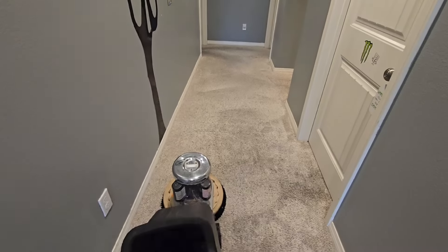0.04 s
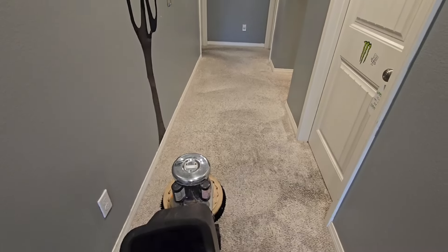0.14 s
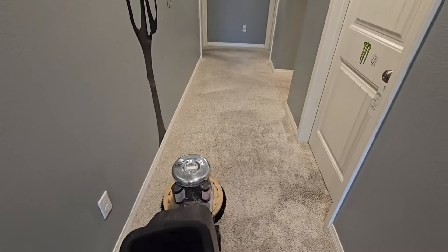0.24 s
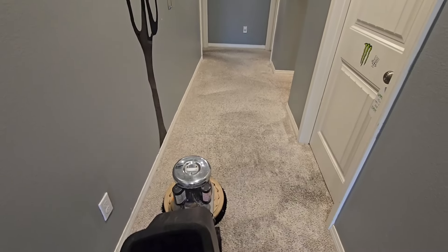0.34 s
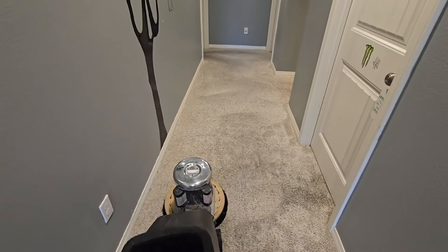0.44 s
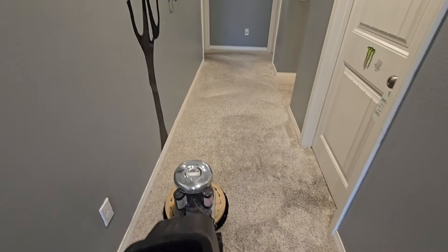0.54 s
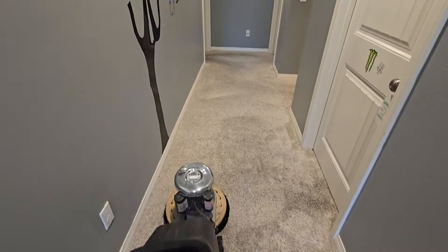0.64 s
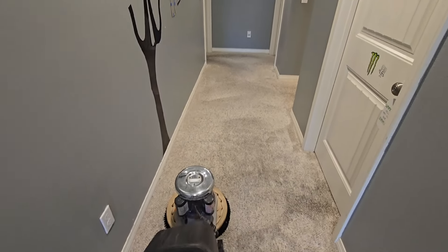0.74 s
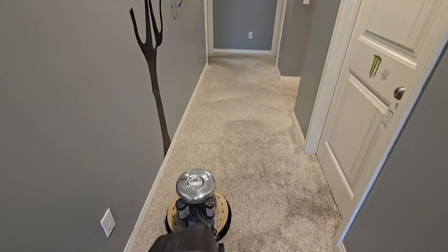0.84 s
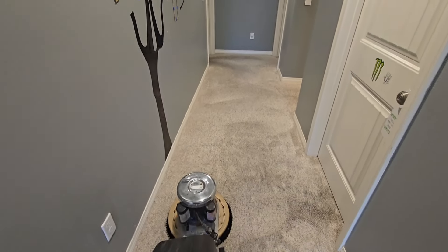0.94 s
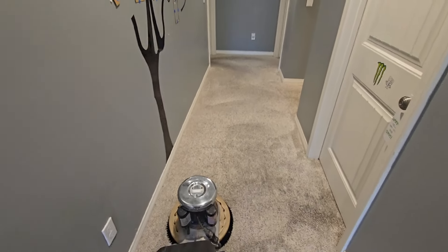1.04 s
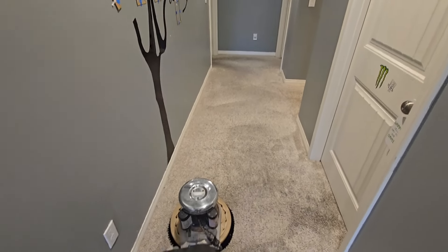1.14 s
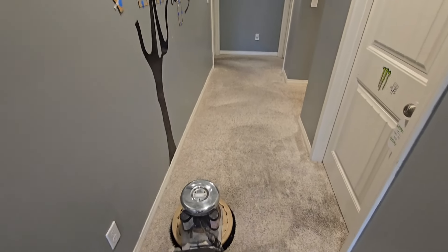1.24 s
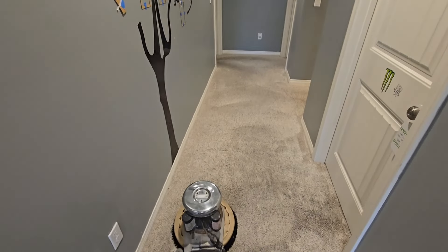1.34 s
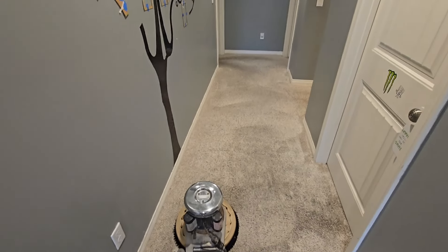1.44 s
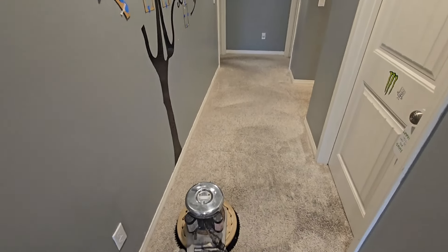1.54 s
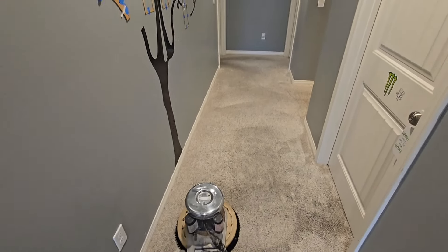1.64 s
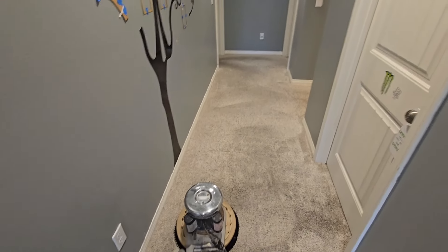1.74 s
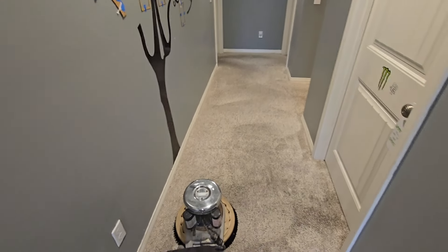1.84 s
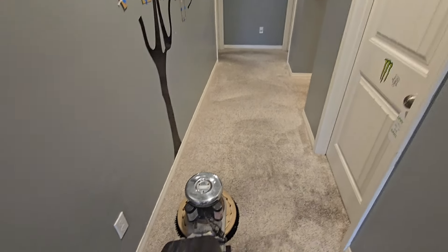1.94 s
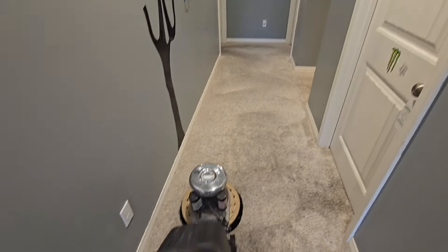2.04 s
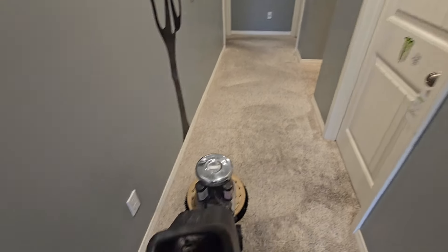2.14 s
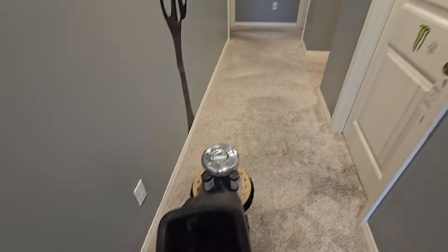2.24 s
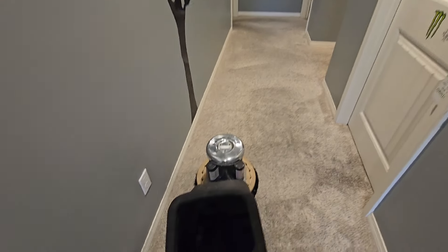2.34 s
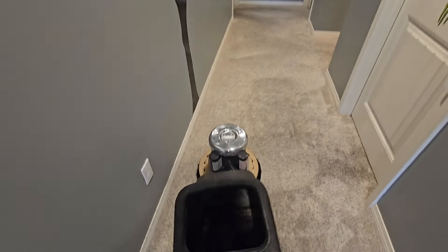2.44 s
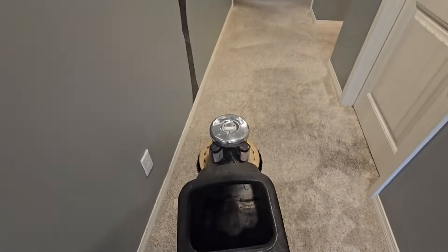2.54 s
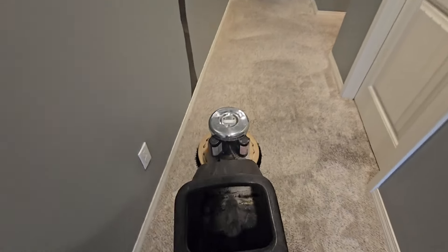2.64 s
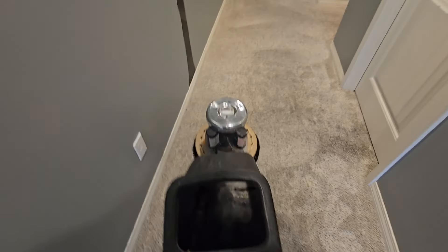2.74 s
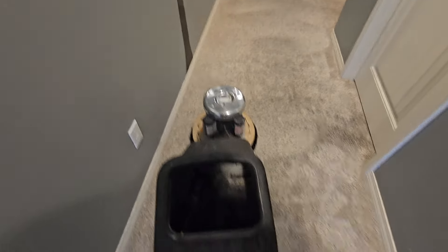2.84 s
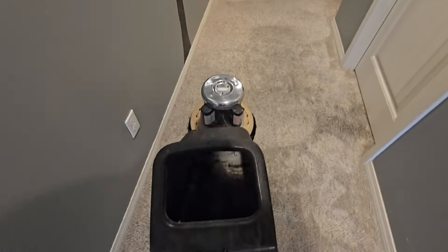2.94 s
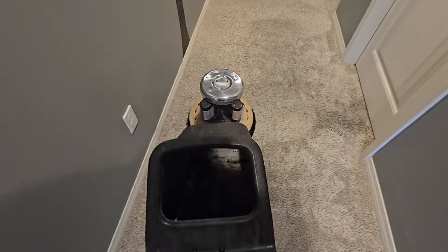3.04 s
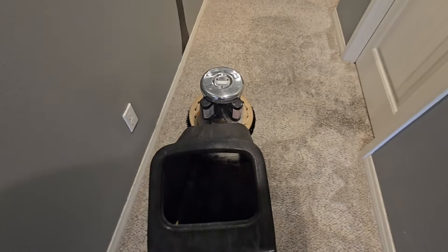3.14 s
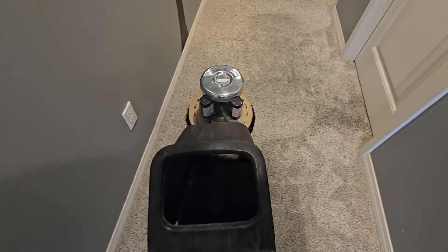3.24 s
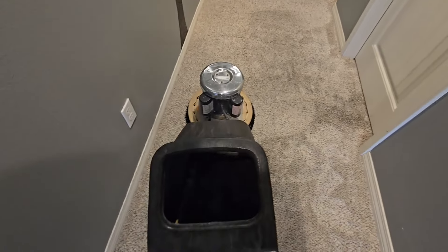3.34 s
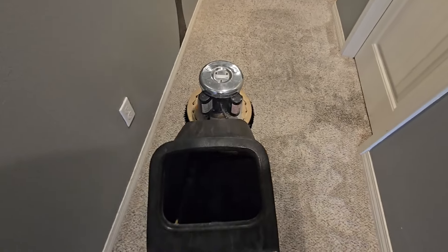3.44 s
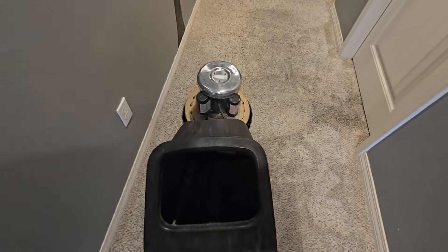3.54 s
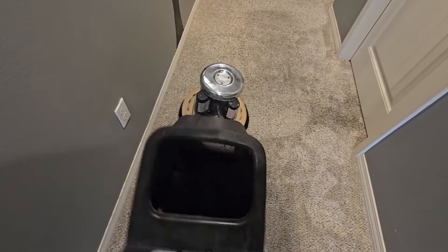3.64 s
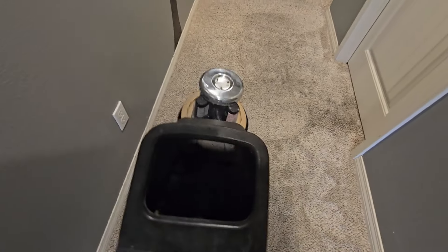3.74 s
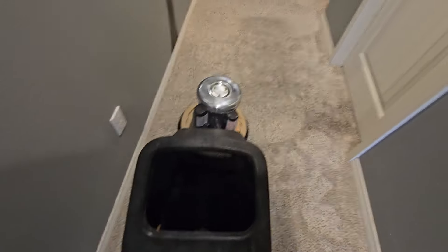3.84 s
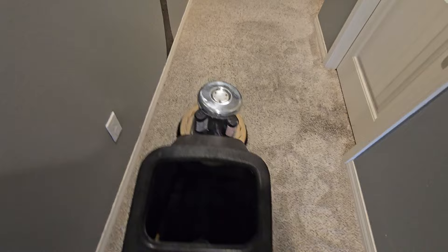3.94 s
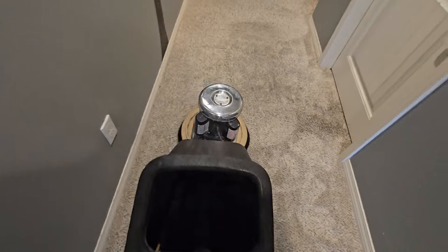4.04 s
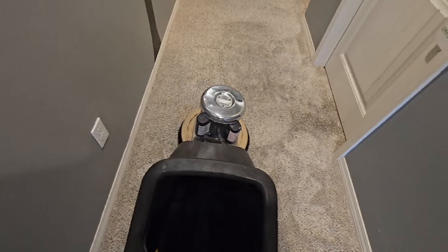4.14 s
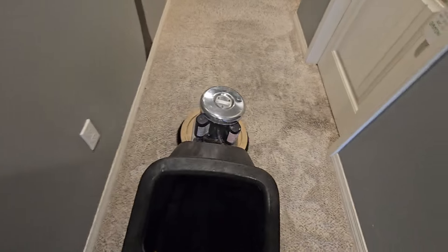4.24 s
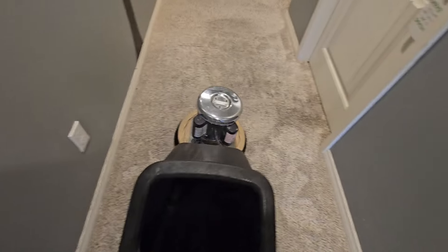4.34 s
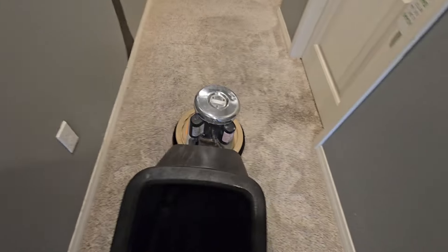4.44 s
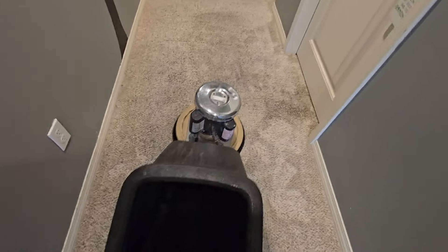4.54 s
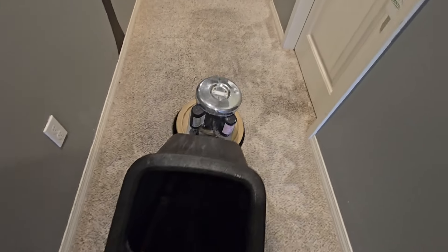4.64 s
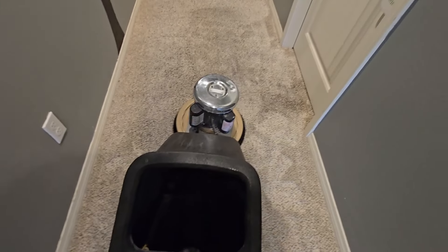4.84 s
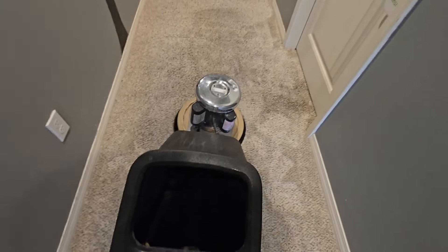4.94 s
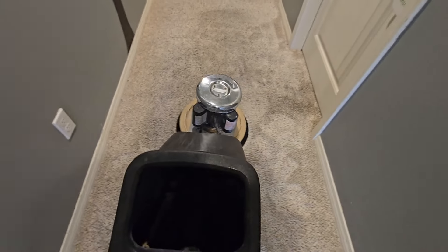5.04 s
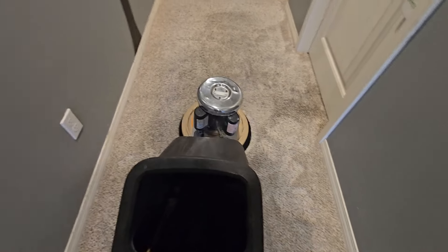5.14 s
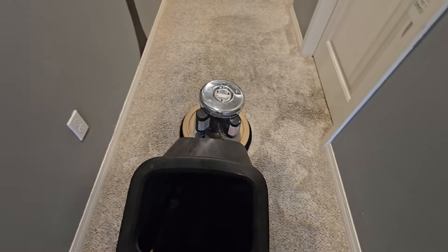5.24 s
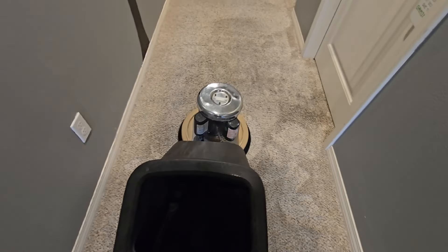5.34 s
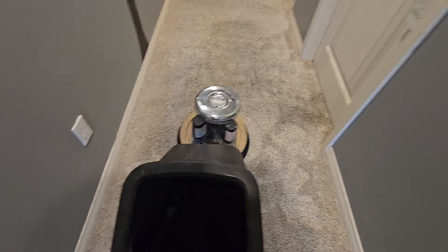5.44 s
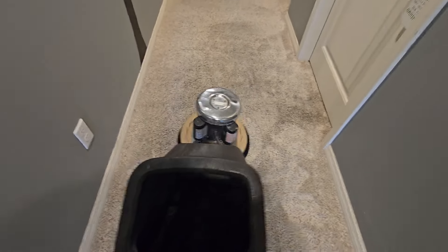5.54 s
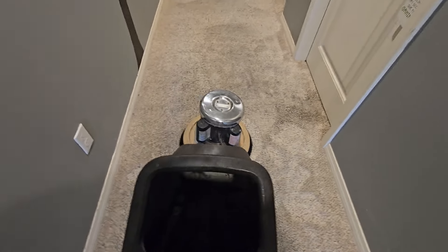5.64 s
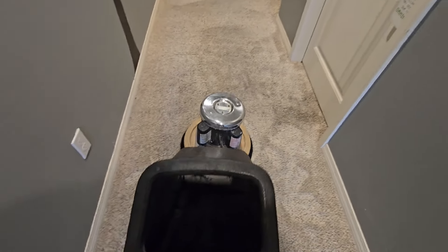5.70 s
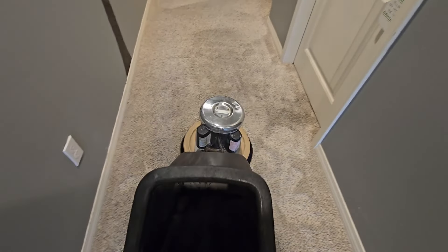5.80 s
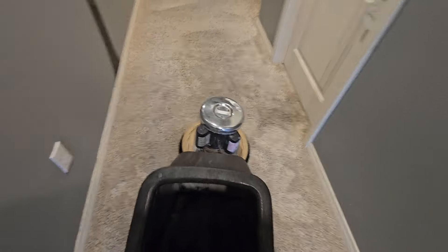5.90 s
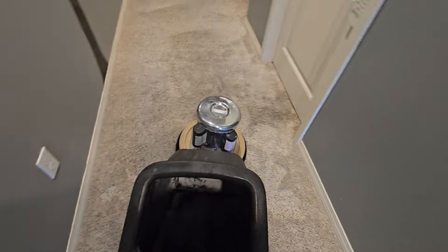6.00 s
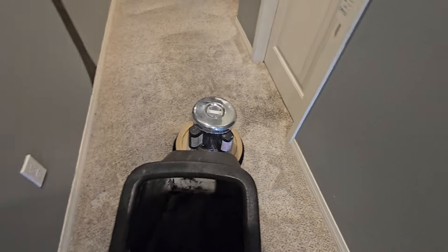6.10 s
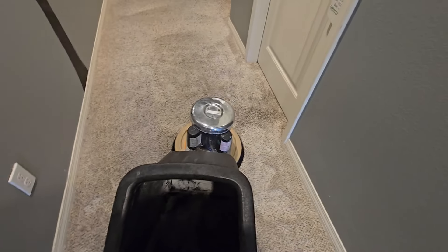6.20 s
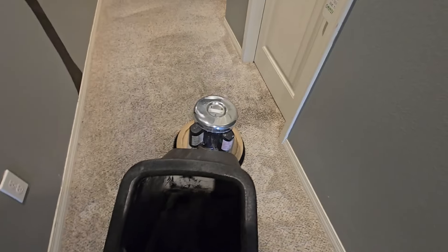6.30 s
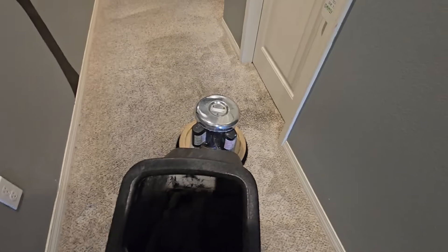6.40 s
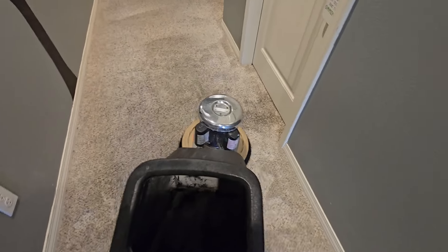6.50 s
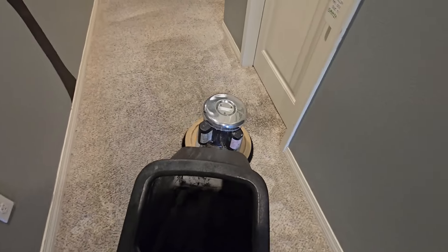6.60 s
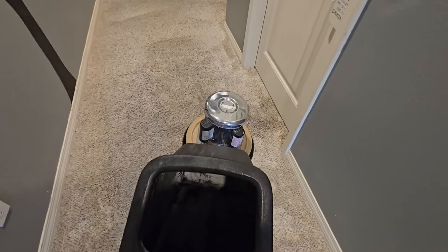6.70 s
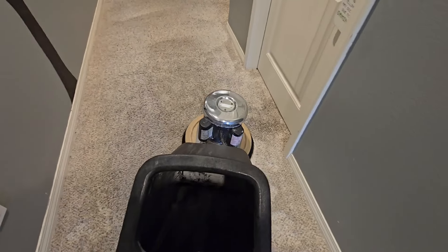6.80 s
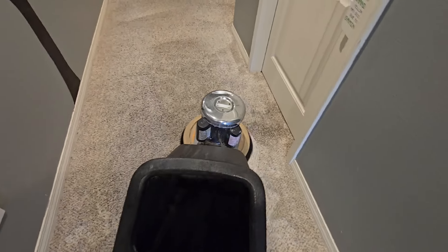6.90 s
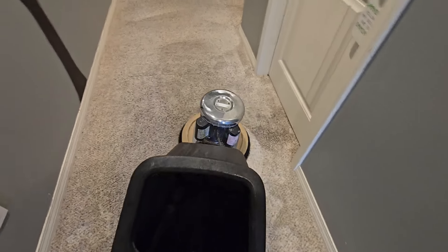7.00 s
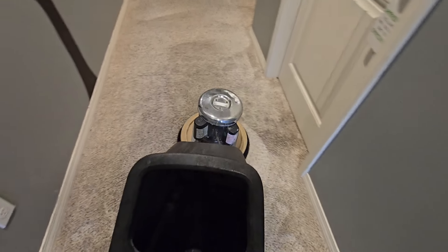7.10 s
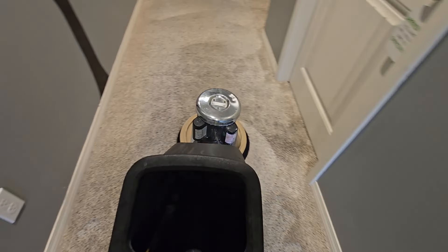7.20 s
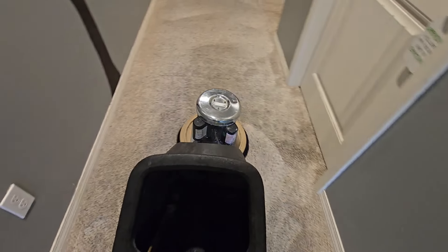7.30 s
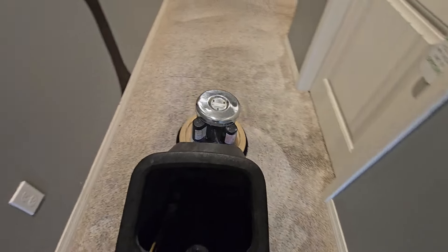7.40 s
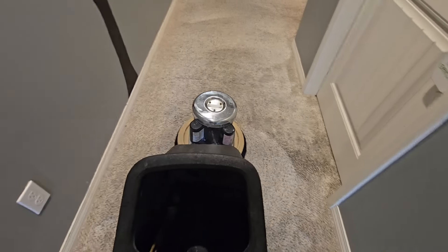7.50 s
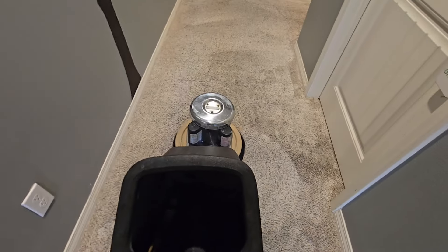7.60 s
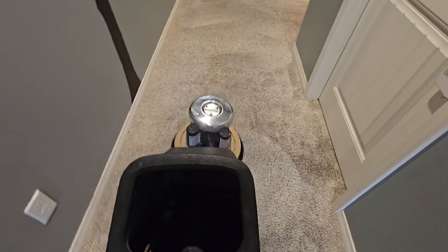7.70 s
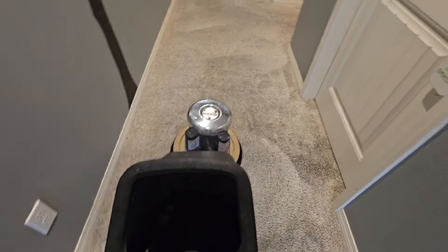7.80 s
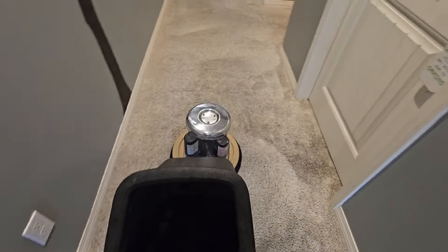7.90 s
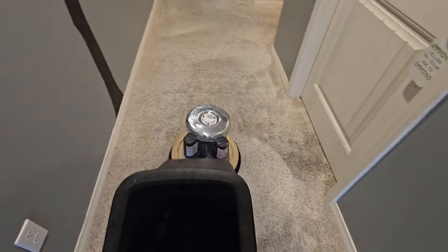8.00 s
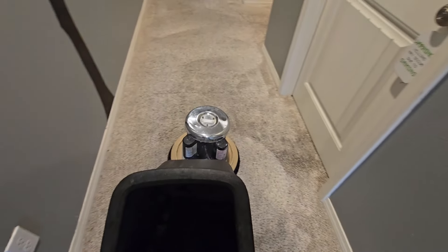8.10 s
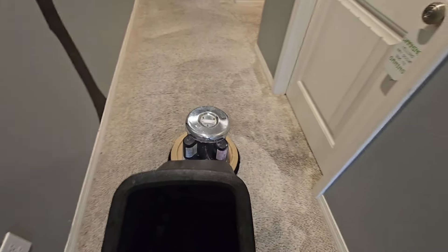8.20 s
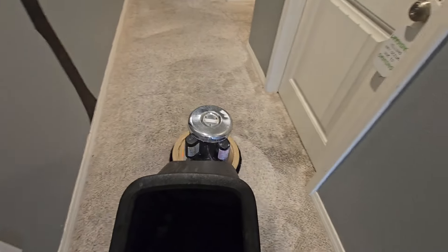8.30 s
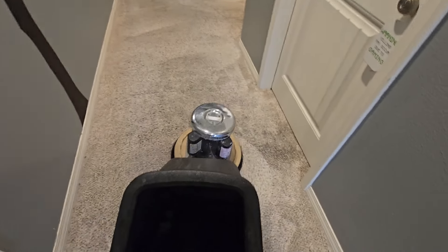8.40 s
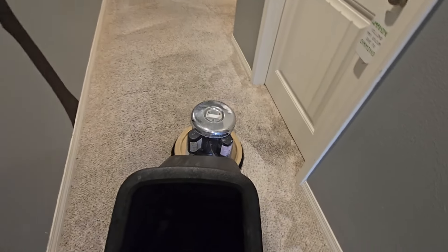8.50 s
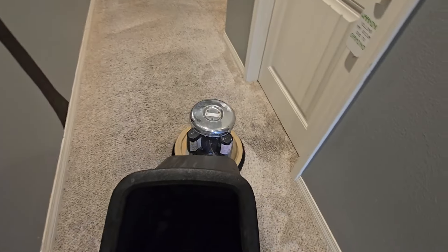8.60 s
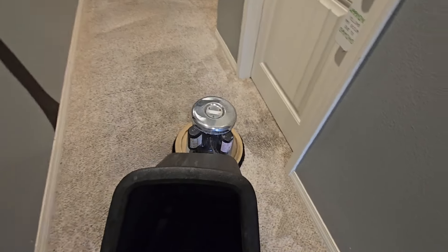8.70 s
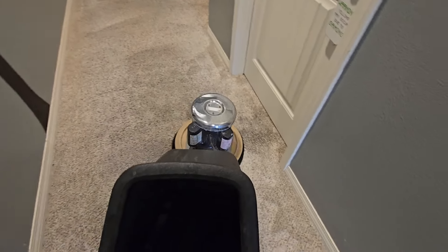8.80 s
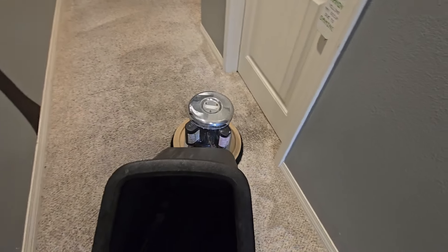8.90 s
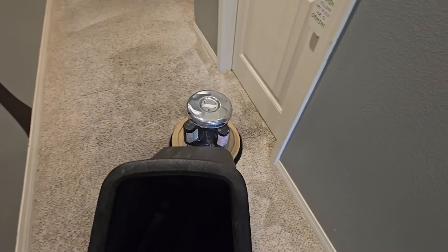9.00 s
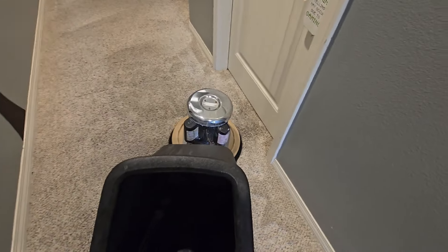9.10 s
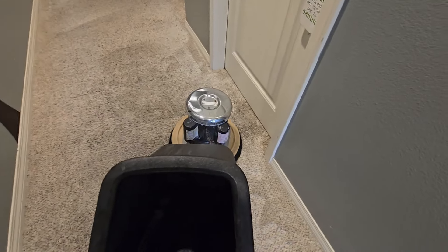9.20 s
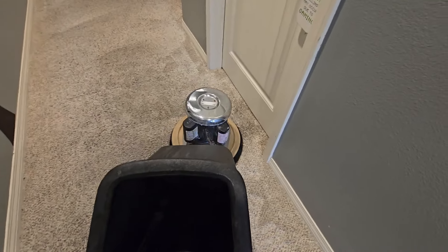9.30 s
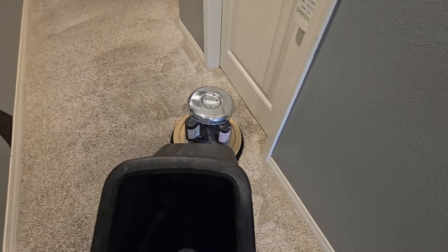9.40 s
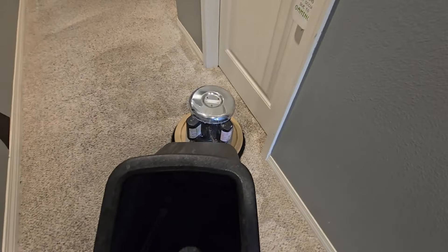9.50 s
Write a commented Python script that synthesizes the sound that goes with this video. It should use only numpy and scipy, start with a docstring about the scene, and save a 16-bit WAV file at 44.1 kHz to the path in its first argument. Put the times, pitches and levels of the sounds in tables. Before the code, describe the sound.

A rotary floor machine knocks and drags over hallway carpet, snaps on with a heavy clunk, surges up and scrubs with a steady bright hiss.

```python
"""Rotary floor machine started on carpet

In a carpeted hallway, heard from the handle, the machine clunks (decaying modes and noise) and is dragged
over the pile (filtered noise, with loose parts rattling). Thin squeaks (wavering sines) come before the switch snaps.
Boom, growl and chatter surge unevenly during the start (resonances), and fibres scrub with a bright hiss (noise)
over a deck that throbs once a turn. Then the shaft shakes the handle (harmonics) and housing and gears sing."""
import sys
import numpy as np
from scipy import signal
from scipy.fft import rfft, irfft
from scipy.io import wavfile
from scipy.ndimage import uniform_filter1d

SR = 44100
rng = np.random.default_rng(int(sys.argv[2]) if len(sys.argv) > 2 else 0)


def wav_record(signal):
    """Record a signal, one row per channel, as 16-bit PCM in the file named by sys.argv[1]."""
    frames = np.transpose(np.atleast_2d(signal))
    bounded = np.clip(frames, -1, 1)
    # unit amplitude maps onto the largest positive 16-bit level
    quanta = np.round(bounded * 32767).astype(np.int16)
    wavfile.write(sys.argv[1], SR, quanta)


N = 421155  # length in samples


def gain_of(db):
    """Level definition: decibels to an amplitude ratio."""
    return 10 ** (np.asarray(db) / 20)


def evened(x):
    """Energy normalisation: scales to rms 1."""
    return x / np.sqrt(np.mean(x ** 2) + 1e-20)


def seconds():
    """Uniform sampling: the time of every sample in s."""
    return np.arange(N) / SR


def read(points, hz):
    """Spectral interpolation: reads a table on a log-frequency axis."""
    f, value = np.transpose(points)
    return np.interp(np.log(hz + 1), np.log(f + 1), value)


def ramp(start, length):
    """Linear onset: rises evenly from 0 to 1, both times in s."""
    return np.clip((seconds() - start) / length, 0, 1)


def add(mix, s, sound):
    """Superposition: adds a sound to the mix at time s."""
    part = mix[:, round(s * SR):][:, :sound.shape[-1]]
    part += sound[..., :part.shape[1]]


# likeness of left and right: f/Hz, correlation (no unit)
LIKENESS = [(60, 0.64), (290, 1), (640, 0.5), (1300, -0.23), (3000, 0.055), (15000, -0.011)]


def correlate(z, hz):
    """Interaural coherence: blends the left spectrum into the right, most strongly in the bass."""
    same = read(LIKENESS, hz)[:, None]
    z[1] = same * z[0] + np.sqrt(1 - same ** 2) * z[1]
    return z


# balance of the two microphones: f/Hz, left minus right level/dB
BALANCE = [(200, -0.5), (400, -1.5), (700, -1.5), (1300, -.5), (2000, 2), (2700, 1), (4400, 3), (6300, 1.5),
           (7400, -1.2), (9300, -3), (11000, -1.5), (12000, 1.5), (13400, -4.5), (15200, 3.5)]


def noise(spectrum, ripple_db=0, white=None):
    """Spectral shaping: noise at rms 1, with slowly drifting ripples from reflections off the walls."""
    white = rng.standard_normal((2, N)) if white is None else white
    hz, _, z = signal.stft(white, SR, nperseg=2048)
    z = correlate(z, hz)
    ripple = evened(uniform_filter1d(rng.standard_normal(z.shape), size=24, axis=2))
    # ripples are deepest in the middle, shallower in bass and treble
    depth_db = ripple_db * hz ** 2 / (hz ** 2 + 600 ** 2) / (1 + (hz / 7000) ** 2)
    colour_db = read(spectrum, hz) + np.array([[0.5], [-0.5]]) * read(BALANCE, hz)
    shaping = gain_of(colour_db[..., None] + depth_db[:, None] * ripple)
    return evened(signal.istft(z * shaping, SR)[1][:, :N])


def ring(hz, width, steady=0, spread=0.3):
    """Randomly driven resonance; steady (0-1) evens its beating, as friction does when it sustains a mode."""
    offset = (np.fft.fftfreq(N, 1 / SR) - hz) / width
    drive = rng.standard_normal((2, N)) + 1j * rng.standard_normal((2, N))
    z = np.fft.ifft(drive / (1 + offset ** 2) ** 2)
    swing = np.hypot(evened(abs(z)), 0.5)
    mid, side = (evened(v.real) for v in z / swing ** steady)
    return evened(np.array([mid + spread * side, mid - spread * side]))


def resonances(table, steady, spread):
    """Modal superposition: a set of resonances sounding together, at rms 1."""
    return evened(sum(gain_of(db) * ring(hz, width, steady, spread) for hz, width, db in table))


# quiet air of the house, shape of its spectrum: f/Hz, relative level/dB
ROOM_TONE = [(30, -14), (150, 0), (215, 6), (300, 1.5), (450, -4), (700, -7), (900, -24), (1400, -15),
             (2600, -18.5), (4300, -23), (5500, -23), (9000, -54), (15000, -58)]
ROOM_DB = -70  # rms, re full scale


def room_tone():
    """Stationary background noise: the quiet air of the house."""
    return gain_of(ROOM_DB) * noise(ROOM_TONE, ripple_db=8.5)


DRAG_RELEASE_S = 0.046  # time constant


def dragging(start, attack, length, db, swell_db):
    """Friction envelope: a drag takes hold, swells or eases, and lets go exponentially."""
    release = np.exp(-np.maximum(seconds() - start - length, 0) / DRAG_RELEASE_S)
    return ramp(start, attack) * gain_of(db + swell_db * ramp(start, length)) * release


SNAG_DB, SNAG_HZ = 1.8, 10  # rms depth, and scale of the Gaussian limit on its rate


def snagging():
    """Random amplitude modulation: the pile catches and yields unevenly."""
    hz = np.fft.rfftfreq(N, 1 / SR)
    band = hz * np.exp(-(hz / SNAG_HZ) ** 2)
    swing = irfft(rfft(rng.standard_normal(N)) * band, N)
    return gain_of(SNAG_DB * evened(swing))


# drags of the resting pad over the carpet: start t/s, attack t/s, length t/s,
# relative rustle level/dB, swell by the end level/dB, relative frame rumble level/dB
DRAGS = [(0.14, 0.03, 0.33, -80.5, 9, 3), (0.53, 0.05, 0.16, -81.5, 1, 17), (0.95, 0.03, 0.42, -71, -11, 4),
         (1.95, 0.19, 0.38, -66.5, -3, -1), (2.372, 0.11, 0.42, -57.5, 0.5, 5.5),
         (2.876, 0.06, 0.18, -58.5, -2.5, 9.5), (3.117, 0.23, 0.34, -70, 11, -5),
         (3.46, 0.049, 0.25, -54, 9.5, 4.5)]
# rustle of the pile, shape of its spectrum: f/Hz, relative level/dB
RUSTLE = [(40, -8), (200, -1), (380, 6), (520, 14.5), (850, 2.5), (1500, 3), (2700, -5), (4400, 1.5),
          (5200, -6), (7000, -3.5), (10500, -14), (13000, -7), (16000, -14)]
# rumble of the frame, shape of its spectrum: f/Hz, relative level/dB
RUMBLE = [(25, -26), (100, -31), (150, 10), (195, -9), (260, -6), (380, -19), (800, -37)]
# clack of loose parts, here and in the knocks, shape of its spectrum: f/Hz, relative level/dB
CLACK = [(200, -15), (450, -4), (800, -6), (1100, -11), (1400, -7.5), (1650, -11.5), (2150, -3),
         (2600, -13.5), (4100, -9.5), (5200, -23), (8000, -30), (15000, -58)]
RATTLES_PER_S, RATTLE_SPREAD_DB, RATTLE_T60_S = 20, 5, 0.14  # mean rate, range below the strongest, decay


def shuffle():
    """Sliding friction: the resting pad rustles on the pile, the frame rumbles, jolted loose fittings rattle."""
    drags = np.array([dragging(*row[:-1]) for row in DRAGS]) * snagging()
    rumble = gain_of(1 + np.array(DRAGS)[:, -1]) @ drags * noise(RUMBLE)
    jolts = (rng.random(N) < RATTLES_PER_S / SR) * gain_of(-RATTLE_SPREAD_DB * rng.random(N))
    dying = signal.lfilter([1], [1, -gain_of(-60 / (RATTLE_T60_S * SR))], jolts)
    rattle = gain_of(4) * dying * noise(CLACK, ripple_db=6)
    rustle = gain_of(4.5) * noise(RUSTLE, ripple_db=7.5)
    return drags.sum(0) * (rustle + rattle) + rumble


# reverberation time of the hallway: f/Hz, time for a 60 dB decay t/s
HALL = [(150, 0.49), (400, 0.52), (1000, 0.49), (2500, 0.4), (6000, 0.51), (14000, 0.41)]


def hallway(x):
    """Reverberation: dense reflections between close walls, each band decaying at its own rate."""
    hz, t, z = signal.stft(rng.standard_normal((2, SR // 2)), SR, nperseg=256)
    decay = gain_of(-60 * t / read(HALL, hz)[:, None])
    build_up = 1 - np.exp(-t / 0.002)
    tail = signal.istft(correlate(z, hz) * decay * build_up, SR)[1]
    return signal.fftconvolve(x, tail / np.linalg.norm(tail[0]), axes=1)[:, :N]


# knocks of handle, frame and switch: t/s, relative thump level/dB, relative clack level/dB,
# relative tick level/dB, struck part f/Hz, its relative ring level/dB
KNOCKS = [(0.307, -42, -65, -88, 680, -56), (0.337, -39.5, -57, -85, 807, -51),
          (0.366, -47, -58, -88, 818, -55), (0.712, -51.5, -67, -92, 1070, -60),
          (1.059, -39.5, -55, -80, 2080, -55.5), (1.082, -40.5, -60, -85, 2160, -71),
          (1.315, -38, -35.5, -40.5, 2280, -39), (1.331, -30.5, -38, -41.5, 1470, -42),
          (1.346, -43, -38.5, -52, 880, -45), (2.237, -80, -59, -67, 1345, -55.5),
          (2.702, -35.5, -62, -74, 507, -51), (2.776, -37.5, -48, -66, 2550, -59),
          (2.81, -45, -48, -68, 1940, -51), (2.879, -57, -46.5, -66, 1040, -50.5),
          (2.994, -36.5, -31.5, -65, 3850, -59), (3.264, -53, -54, -49, 1700, -64),
          (3.311, -44.5, -60, -74, 1460, -52), (3.402, -58, -55, -72, 2400, -54),
          (3.457, -57, -49, -72, 1100, -55), (3.629, -31, -36, -32, 5500, -53),
          (3.651, -37, -34, -35, 2080, -52), (3.671, -18, -12, -25, 507, -18),
          (3.683, -9, -26, -30, 2120, -38), (3.809, -22, -49, -50, 1260, -26)]
# modes of the frame, each knock detuning them slightly: centre f/Hz, relative level/dB, 60 dB decay t/s
FRAME_MODES = [(151.5, 3.5, 0.18), (178, -8.5, 0.25), (236, -5.5, 0.17), (338, -3.5, 0.065),
               (504, -3.5, 0.058)]
# tick of the knocks, shape of its spectrum: f/Hz, relative level/dB
TICK = [(2500, -30), (5000, 0), (6500, -1), (8500, -10), (10500, -19), (13000, -12), (16000, -22)]
CLACK_T60_S, TICK_T60_S, PART_T60_S = 0.081, 0.042, 0.13  # decays by 60 dB
THUMP_RISE_S, CLACK_RISE_S = 0.015, 0.0011  # time constants of the onsets
PART_WIDTH_HZ = 170  # half-width of the struck part's band, at half amplitude


def knocks():
    """Impact excitation: a short rattle and the ring of the struck part, over the low modes of the frame."""
    t = np.arange(SR // 2) / SR
    low, high = np.zeros((2, N)), np.zeros((2, N))
    clacks, ticks = noise(CLACK), noise(TICK, ripple_db=2)
    offset = np.fft.fftfreq(len(t), 1 / SR) / PART_WIDTH_HZ
    for s, thump_db, clack_db, tick_db, part_hz, part_db in KNOCKS:
        frame = 0
        for hz, db, t60 in FRAME_MODES:
            detune = 1 + 0.022 * rng.standard_normal()
            frame = frame + gain_of(db - 60 * t / t60) * np.sin(2 * np.pi * hz * detune * t)
        add(low, s, gain_of(thump_db + 5) * frame * (1 - np.exp(-t / THUMP_RISE_S)))
        # close modes of the struck part beat against one another
        phases = np.exp(2j * np.pi * rng.random((2, len(t))))
        beating = np.fft.ifft(phases / (1 + offset ** 2))
        struck = evened((beating * np.exp(2j * np.pi * part_hz * t)).real)
        struck *= gain_of(part_db + 3 - 60 * t / PART_T60_S)
        span = slice(round(s * SR), round(s * SR) + len(t))
        rattle = clacks[:, span] * gain_of(clack_db + 3 - 60 * t / CLACK_T60_S)
        rattle += ticks[:, span] * gain_of(tick_db + 3 - 60 * t / TICK_T60_S)
        add(high, s, (struck + rattle) * (1 - np.exp(-t / CLACK_RISE_S)))
    return low + gain_of(-9) * hallway(low) + high + gain_of(-3) * hallway(high)


def level(rows, order, fade=0.037):
    """Level envelope: gain from one dB column, fading outside its span by a Gaussian of scale fade in s."""
    rows, t = np.array(rows), seconds()
    outside = np.maximum(np.maximum(rows[0, 0] - t, t - rows[-1, 0]), 0)
    return gain_of(np.interp(t, rows[:, 0], rows[:, order])) * np.exp(-(outside / fade) ** 2)


def glide(rows, wobble_hz):
    """Frequency modulation: a thin, unsteady tone of parts rubbing together; wobble_hz is rms."""
    s, hz, _ = np.transpose(rows)
    wobble = evened(uniform_filter1d(rng.standard_normal((2, N)), size=60))
    turns = np.cumsum(np.interp(seconds(), s, hz) + wobble_hz * wobble, axis=1) / SR
    return level(rows, order=2) * evened(np.sin(2 * np.pi * turns))


# faint squeak while the weight shifts: t/s, f/Hz, rms level/dB
SQUEAK = [(1.6, 4500, -80), (1.7, 4370, -73), (1.86, 4000, -94), (1.96, 4120, -72), (2.08, 4400, -77),
          (2.2, 4750, -80)]
# thin rising squeal: t/s, f/Hz, relative level/dB
SQUEAL = [(3.31, 7000, -80), (3.325, 7800, -59), (3.345, 10000, -68), (3.375, 11300, -65),
          (3.41, 11700, -73), (3.46, 12500, -82)]


def squeal():
    """Friction tones: a faint squeak as the weight shifts, and a higher squeal just before the start."""
    return glide(SQUEAK, wobble_hz=140) + gain_of(-4) * glide(SQUEAL, wobble_hz=220)


SHAFT_HZ, GEAR_RATIO = 28.98, 10  # shaft speed, and shaft turns to one of the pad


def pad_turn(top_s):
    """Periodic modulation: swings between 1 and -1 once on each turn at running speed, with a peak at top_s."""
    return np.cos(2 * np.pi * (seconds() - top_s) * SHAFT_HZ / GEAR_RATIO)


# how hard the running pad bears on the pile: t/s, relative level/dB
PRESSURE = [(3.9, -2), (4.6, 0), (5.7, 0), (6.85, 2), (7.55, -0.4), (8.65, -1.1), (9.15, 2.6), (9.55, 2)]
# body of the scrubbing, shape of its spectrum: f/Hz, relative level/dB
SCRUB = [(30, -8), (104, -19), (125, -2), (200, 3), (235, -2), (295, 8.5), (365, 0), (425, 6.5), (520, 2),
         (590, -0.5), (1350, 0), (1600, -7), (1950, 0.5), (4000, -9.5), (8000, -59), (16000, -40)]
# hiss of the fibres, shape of its spectrum: f/Hz, relative level/dB
HISS = [(1200, -37), (2600, -3.5), (4300, 0.5), (5700, -1), (7400, -0.5), (8900, -2), (9800, -4.5),
        (10900, -7), (11900, -1), (13500, -2), (15400, -2)]
MOTOR_ON_S, SPIN_UP_S = 3.662, 0.29  # start and length of the linear growth of the scrubbing
BRISK_SIDE_S = 4.59  # a moment when the pad's freshest fibres sweep the pile
HEAVY_SIDE_S = 4.655  # a moment when the pad's heavy side bears down
THROB_EASE_DB_PER_S = 0.5  # the deck booms less as the pile is laid flat
FLICKS_PER_S = 9000  # in each channel


def scrub():
    """Granular friction: fibres flick off the pad, louder with speed and pressure; hiss and deck swell each turn."""
    t = seconds()
    flicks = rng.standard_normal((2, N)) * (rng.random((2, N)) < FLICKS_PER_S / SR)
    fibres = rng.standard_normal((2, N)) + 0.75 * evened(flicks)
    speed = ramp(MOTOR_ON_S, SPIN_UP_S)
    pressure = gain_of(np.interp(t, *np.transpose(PRESSURE)))
    # the body answers only weakly to pressure
    body = gain_of(-21.5) * pressure ** 0.16 * noise(SCRUB, ripple_db=3.5)
    hiss = gain_of(-18 + 0.42 * pad_turn(BRISK_SIDE_S)) * noise(HISS, ripple_db=3, white=fibres)
    throb_db = -32 + 2 * pad_turn(HEAVY_SIDE_S) - THROB_EASE_DB_PER_S * (t - MOTOR_ON_S)
    throb = gain_of(throb_db) * ring(150, 18, steady=0.5, spread=0.12)
    return speed * (body + pressure * hiss + throb)


# uneven surges in level during the start: t/s at the height,
# relative level/dB of the deck's boom, the housing's growl and the cover's chatter
SURGES = [(3.815, -20, -27, -26), (3.92, -13.5, -15, -18), (4.035, -24, -18.5, -16),
          (4.095, -16.5, -14.5, -29), (4.155, -16, -23, -16.5), (4.235, -11.5, -17, -20),
          (4.3, -27, -19, -17.5), (4.369, -13.5, -23, -20.5)]
SURGE_WIDTH_S = 0.048  # Gaussian scale of each rise and fall


def surging(order):
    """Energy summation: the uneven level of one column, as overlapping rounded surges."""
    t = seconds()
    surges = [gain_of(row[order]) * np.exp(-((t - row[0]) / SURGE_WIDTH_S) ** 2) for row in SURGES]
    return np.sqrt(sum(surge ** 2 for surge in surges))


# housing resonances: centre f/Hz, width scale f/Hz, relative level/dB
GROWL = [(240.5, 38, 1.5), (273, 36, 1), (344, 32, -9.5), (402, 36, -13.5)]
# cover resonances: centre f/Hz, width scale f/Hz, relative level/dB
CHATTER = [(472, 22, -5.5), (521, 32, 1), (630, 45, -13), (890, 100, -11.5), (1240, 320, -12)]


def starting_resonances():
    """Structural resonance: boom of deck, growl of housing and chatter of cover surge unevenly during the start."""
    boom = ring(150, 20, steady=0.85, spread=0.1)
    growl = resonances(GROWL, steady=0.73, spread=0.27)
    chatter = resonances(CHATTER, steady=0.57, spread=0.3) * gain_of([[-1], [1]])  # leans right
    low = gain_of(-1.5) * surging(order=1) * boom
    middle = gain_of(0.5) * surging(order=2) * growl
    return low + middle + surging(order=3) * chatter


# harmonics of the shaft: multiple of the shaft speed (no unit), relative level/dB
ORDERS = [(1, -1), (2, -25.5), (3, -26)]
# resonances of housing and gears at speed: centre f/Hz, width scale f/Hz, rms level/dB at full speed
WHINES = [(285.5, 8.2, -43.5), (316.7, 6.7, -45.5), (465.6, 9.3, -45), (879, 32, -41), (1135, 23, -40),
          (2658, 34, -44)]
SHAKE_FROM_S, SHAKE_RISE_S = 3.94, 0.25  # the shaft shakes the handle only near full speed
SETTLE_DB_PER_S = 0.8  # easing of the shake as the shaft runs in
EAR_LAG_S = 0.0022  # delay of the right channel


def motor():
    """Rotating unbalance: the shaft shakes the handle, easing as it runs in, while housing and gears sing."""
    t = seconds()
    heard = t - np.array([[0], [EAR_LAG_S]])
    shake = evened(sum(gain_of(db) * np.sin(2 * np.pi * k * SHAFT_HZ * heard) for k, db in ORDERS))
    shake_db = -28.5 - SETTLE_DB_PER_S * (t - SHAKE_FROM_S)
    shaking = ramp(SHAKE_FROM_S, SHAKE_RISE_S) * gain_of(shake_db)
    gears = sum(gain_of(db) * ring(hz, width, steady=0.4, spread=0.64) for hz, width, db in WHINES)
    return shaking * shake * gain_of([[-0.5], [0.5]]) + ramp(4.2, 0.46) * gears


def scene():
    """Superposition: all sources at the two microphones."""
    sources = [room_tone(), shuffle(), knocks(), squeal(), scrub(), starting_resonances(), motor()]
    return sum(sources)


EDGE_HZ = 15530  # cutoff of the low-pass


def record(dry):
    """Band limitation: sound fades in over 8 ms after an opening silence, then passes a steep low-pass filter."""
    opened = ramp(0.142, 0.008)
    low_pass = signal.firwin(2047, EDGE_HZ, window=("kaiser", 9), fs=SR)
    return signal.oaconvolve(dry * opened, low_pass[None], "same")


dry = scene()
out = record(dry)
wav_record(out)
```